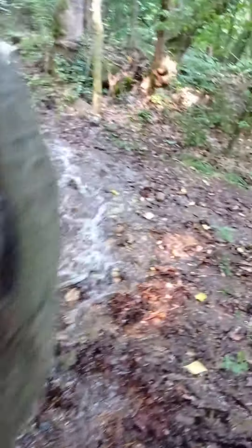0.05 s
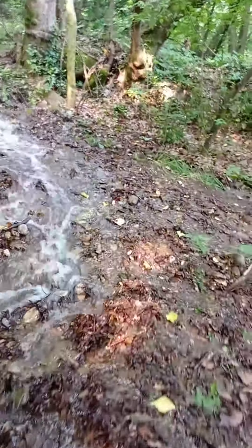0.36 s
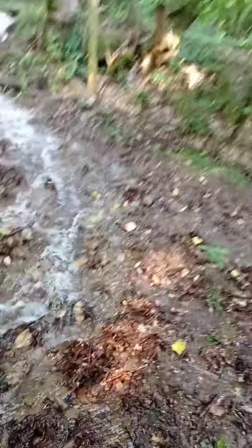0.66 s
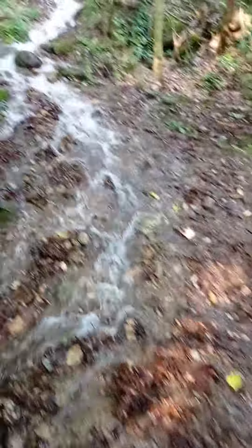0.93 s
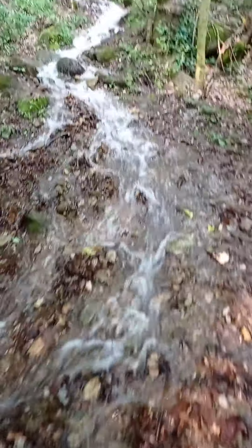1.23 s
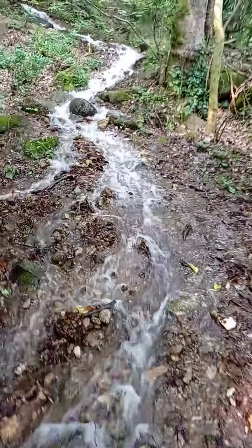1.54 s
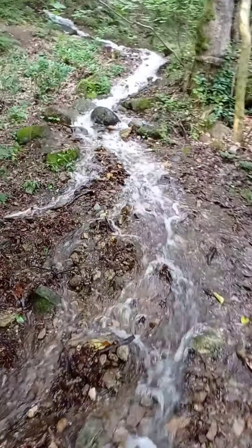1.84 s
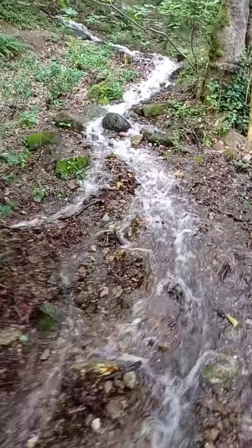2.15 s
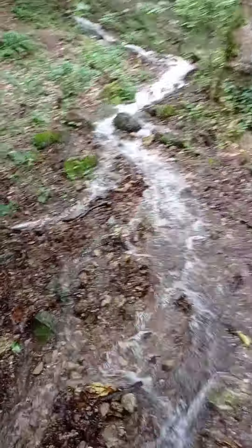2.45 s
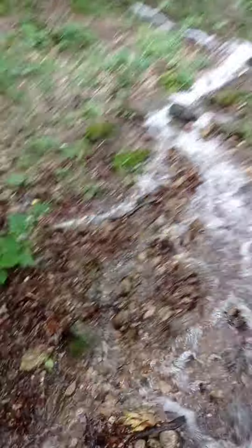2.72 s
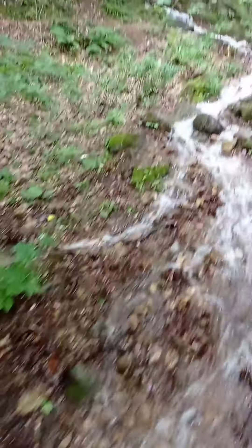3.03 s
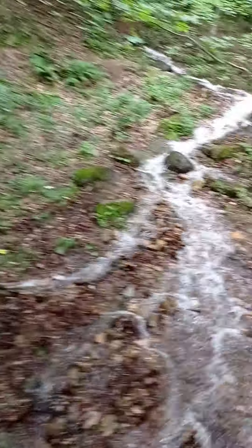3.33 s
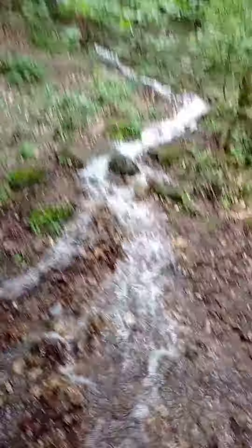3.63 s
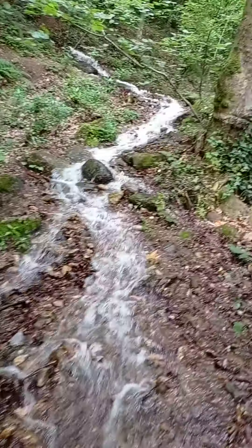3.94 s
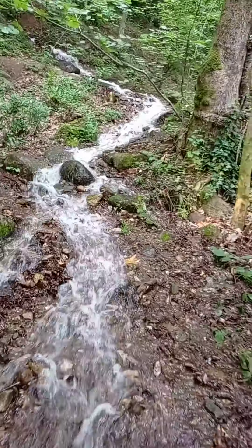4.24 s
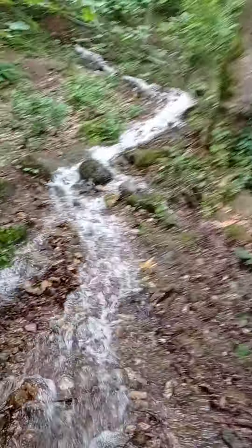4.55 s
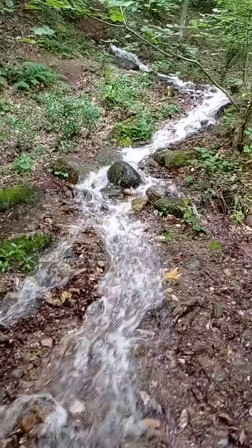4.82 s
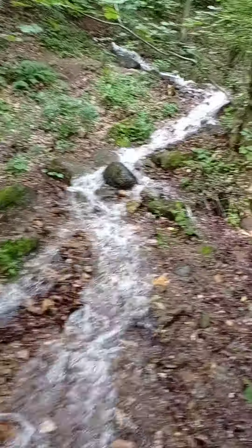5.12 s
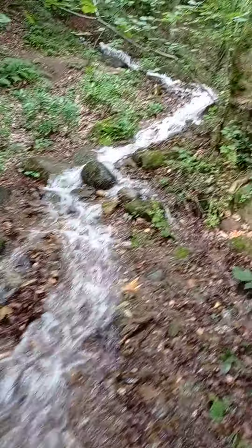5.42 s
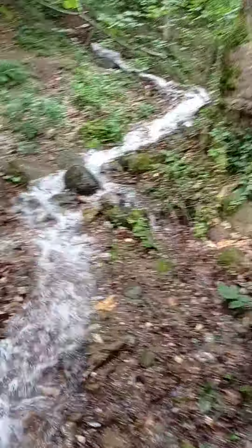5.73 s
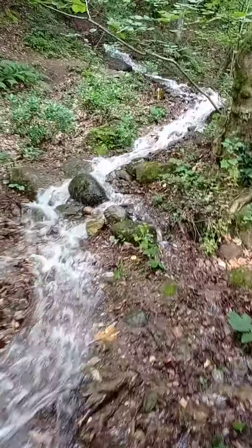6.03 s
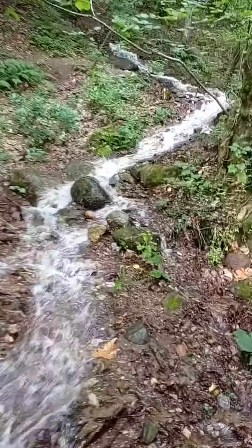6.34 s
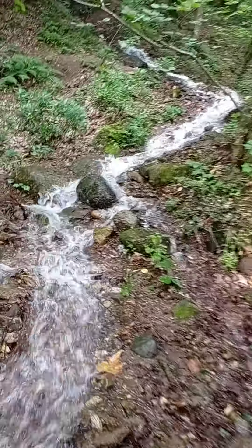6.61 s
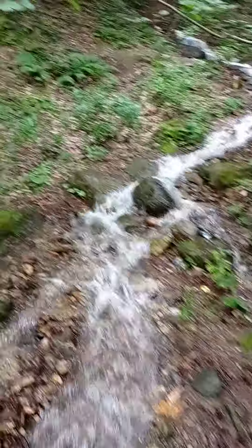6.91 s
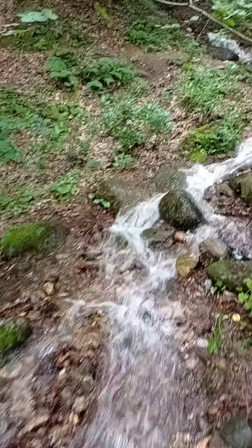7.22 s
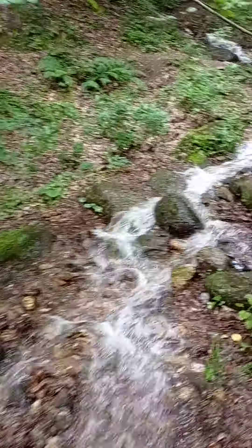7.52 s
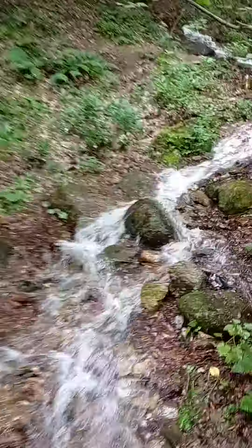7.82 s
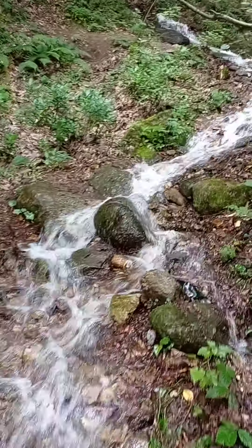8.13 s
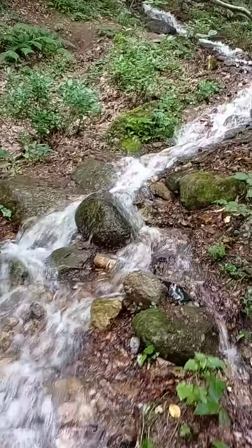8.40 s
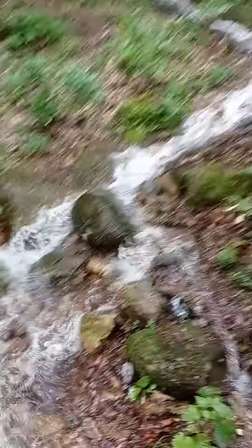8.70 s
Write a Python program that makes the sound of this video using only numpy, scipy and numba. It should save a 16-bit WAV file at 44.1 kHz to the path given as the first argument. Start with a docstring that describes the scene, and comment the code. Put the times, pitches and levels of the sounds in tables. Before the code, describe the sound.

A small stream tumbles over rocks in a forest, a steady wash of bubbling and fine spray with an occasional deeper gurgle. Throughout, a chorus of crickets blends into one shrill, shimmering trill that stands out above the water. The microphone moves slowly toward the cascade, so the splashing grows a little louder and fuller while the crickets stay level.

```python
"""A woodland stream with crickets

A small stream tumbles over rocks while one microphone is carried slowly toward the cascade.
The water is a swarm of ringing bubbles and spray over a soft wash, with now and then a deeper gurgle.
Crickets trill by scraping their wings; the forest blurs them into one shrill, shimmering band."""
import sys
import numpy as np
from scipy import signal
from scipy.fft import rfft, irfft, next_fast_len
from scipy.io import wavfile
from scipy.ndimage import uniform_filter1d
from numba import njit

SR = 44100
rng = np.random.default_rng(int(sys.argv[2]) if len(sys.argv) > 2 else 0)


def dump_mix(stems):
    """Bounce the given channels to the path in sys.argv[1] as a 16-bit WAV at rate SR."""
    frames = np.atleast_2d(stems).T  # one column per channel
    limited = np.clip(frames, -1, 1)  # hard clip at full scale
    pcm = np.round(limited * 32767).astype(np.int16)
    wavfile.write(sys.argv[1], SR, pcm)


N = 395136
TIME = np.arange(N) / SR
# where the microphone is: time_s, place (0 on the bank, 1 midway, 2 close to the rocks)
WALK = [(0, 0.16), (.6, 0.44), (1.7, 1.11), (5.5, 1.37), (7.2, 1.59), (8.9, 1.855)]


def gain_of(db):
    """Turns decibels into a number to multiply a sound by."""
    return 10 ** (np.asarray(db) / 20)


def evened(x):
    """Scales a sound to an average (rms) level of 1."""
    return x / np.sqrt(np.mean(x ** 2) + 1e-20)


def level_at(spectrum, hz):
    """Looks up the level in dB at each pitch, sliding between the rows of a table."""
    pitch_hz, level_db = np.transpose(spectrum)
    return np.interp(np.log(hz + 1), np.log(pitch_hz + 1), level_db)


def follow(rows, t=TIME):
    """Looks up a changing value at the times t."""
    return np.interp(t, *np.transpose(rows))


def add(mix, start_s, sound):
    """Mixes a sound in at its start time."""
    part = mix[max(round(start_s * SR), 0):][:len(sound)]
    part += sound[:len(part)]


def coloured(x, spectrum):
    """Gives a sound the tone colour in a table, at an average level of 1."""
    size = next_fast_len(N)
    gains = gain_of(level_at(spectrum, np.fft.rfftfreq(size, 1 / SR)))
    return evened(irfft(rfft(x, size) * gains, size)[:N])


def wander(per_s, count=2048):
    """A random curve, mostly between -1 and 1, that turns about per_s times a second."""
    return np.interp(TIME * per_s % count, np.arange(count), rng.standard_normal(count))


def ticks(per_s, spread_db, clump_db):
    """Tiny ticks at random times; clump_db makes them swell in clumps."""
    sizes = gain_of(spread_db * np.minimum(rng.exponential(1, N), 5)) * rng.choice([-1, 1], N)
    hits = rng.random(N) < per_s / SR
    return evened(sizes * hits * gain_of(clump_db * wander(45)))


def forest(x, fade_s, echo_db):
    """Trunks and leaves scatter a sound into a tail that falls 60 dB in fade_s."""
    t = np.arange(SR) / SR
    tail = rng.standard_normal(SR) * gain_of(-60 * t / fade_s)
    return x + gain_of(echo_db) * signal.oaconvolve(x, tail / np.linalg.norm(tail))[:N]


def water_gain(brook_db=-38.5, reach_m=2.115, close_m=0.99, spacing_m=2.01):
    """The brook is equally loud everywhere; the cascade adds to it, and matches it at reach_m."""
    distance_m = close_m + spacing_m * np.maximum(2 - follow(WALK), 0)
    return gain_of(brook_db) * np.hypot(1, reach_m / distance_m)


def high_hiss(relative_db=-25.8, crackle_db=-1, flicker_db=1.2):
    """A faint, thin, flickering hiss in the very highest treble."""
    # tone colour of the hiss: pitch_hz, level_db
    top_band = [(12500, -40), (13900, -17), (14350, -5), (14600, 0.5), (16000, 0), (16900, -60)]
    noise = rng.standard_normal(N)
    crackle = gain_of(crackle_db) * ticks(per_s=1600, spread_db=4.2, clump_db=2.5)
    hiss = coloured(noise + crackle, top_band)
    return hiss * water_gain() * gain_of(relative_db + flicker_db * wander(110))


def cricket(hz, trill_hz, sag, scrape):
    """Each wing stroke drags a toothed file: a short scratchy tone that sags in pitch."""
    stroke_hz = trill_hz * (1 + .04 * wander(3))
    stroke = (rng.random() + np.cumsum(stroke_hz) / SR) % 1  # runs from 0 to 1 in each stroke
    pitch_hz = hz * (1 + sag * (.5 - stroke) + scrape * wander(1800))
    closing = np.maximum(np.sin(np.pi * np.minimum(stroke / 0.65, 1)), 0)
    return closing * np.sin(2 * np.pi * np.cumsum(pitch_hz) / SR)


def crickets(group_db=-1, singers_db=-4.5, count=16, swell_db=0.37):
    """One steady singer, a group that comes and goes, and countless far ones merged into a hiss."""
    # tone colour of the chorus: pitch_hz, level_db
    song = [(4500, -34), (5100, -20), (5550, -11.5), (6000, -4.5), (6350, -1.65), (6650, -1.5),
            (6820, -4.5), (7100, -6), (7550, -10), (8000, -16), (8350, -18), (9100, -30), (10500, -46),
            (13000, -67)]
    # loudness of the chorus, before its random swells: time_s, level_db
    loudness = [(0, -27), (1.3, -26), (2.4, -26.3), (3.3, -25.7), (6.6, -26), (8.9, -26.5)]
    group = sum(cricket(hz, rng.uniform(24, 62), sag=0.0952, scrape=.06) * gain_of(wander(2.03))
                for hz in np.linspace(5500, 8100, count))
    leader = gain_of(-13.5) * evened(cricket(hz=6450, trill_hz=25.9, sag=0.082, scrape=.07))
    singers = forest(gain_of(group_db) * evened(group) + leader, fade_s=0.44, echo_db=-1)
    far = coloured(rng.standard_normal(N), song)
    chorus = far + gain_of(singers_db) * coloured(singers, song)
    return evened(chorus) * gain_of(follow(loudness) + swell_db * wander(10))


def bubble(hz, cycles, rise):
    """Trapped air rings for some cycles; its pitch climbs as it nears the surface."""
    age = np.arange(int(5 * cycles / hz * SR) + 2) / SR * hz / cycles
    swell = (1 - np.exp(-age * 10)) * np.exp(-age)
    return swell * np.sin(2 * np.pi * cycles * age * (1 + rise * age / 2))


def splashes(cycles=5.08, rise=0.043, drop_fade_s=.008, gurgle_db=2.5, drop_db=-8):
    """Single bubbles and near drops stand out of the flow and echo among the trees."""
    # the loudest bubbles: time_s, pitch_hz, level_db (gurgle_db is added)
    gurgles = [(.552, 516, -35), (1.159, 990, -33), (1.446, 2400, -30), (2.248, 320, -34),
               (2.593, 4795, -28), (3.603, 299, -37), (3.636, 412, -31.5), (3.798, 771, -30.5),
               (4.226, 880, -32.5), (4.437, 335, -34), (5.212, 266, -36), (5.886, 206, -35),
               (6.772, 890, -27), (6.915, 380, -31.5), (7.19, 630, -31), (7.522, 262, -34),
               (8.119, 280, -35), (8.596, 824, -26.5)]
    # drops that land on stone nearby: start_s, level_db (drop_db is added)
    drops = [(.97, -32), (1.446, -36), (3.459, -35), (7.711, -36), (8.049, -35), (8.419, -36)]
    glugs_per_s, low_hz, high_hz, glug_db = 2.2, 282, 3300, -38  # softer bubbles that come by chance
    when, pitch = rng.random((round(glugs_per_s * N / SR), 2)).T
    glug_hz = low_hz * (high_hz / low_hz) ** pitch
    glugs = [(time_s, hz, glug_db) for time_s, hz in zip(when * N / SR, glug_hz)]
    mix, t = np.zeros(N), np.arange(1024) / SR
    for time_s, hz, level_db in gurgles + glugs:
        rings = cycles * (hz / 1000) ** .2
        start_s = time_s - 0.589 * rings / hz  # early, so the ring is centred near time_s
        add(mix, start_s, gain_of(level_db + gurgle_db) * bubble(hz * (1 - rise), rings, rise))
    for start_s, level_db in drops:
        fade = gain_of(level_db + drop_db - 60 * t / drop_fade_s)
        add(mix, start_s, fade * rng.standard_normal(len(t)))
    return forest(mix, fade_s=0.19, echo_db=-15)


@njit
def ring_bubbles(rows, length):
    """Adds up many bubbles, each a fading tone that rises in pitch."""
    mix = np.zeros(length)
    for start, cycles_per_sample, cycles, rise, size in rows:
        for i in range(min(int(4 * cycles / cycles_per_sample), length - int(start))):
            age = i * cycles_per_sample / cycles
            swell = (1 - np.exp(-age * 10)) * np.exp(-age)
            tone = np.sin(2 * np.pi * cycles * age * (1 + rise * age / 2))
            mix[int(start) + i] += size * swell * tone
    return mix


def bubbles(spread_db, cycles, rise, count=70000):
    """A swarm of bubbles: small ones ring high and are alike, large ones ring low and are uneven."""
    when, smallness, strength, sustain, climb = rng.random((count, 5)).T
    hz = 150 + 15000 * smallness ** 1.7
    rings = cycles * (hz / 1000) ** 0.38 * (.5 + sustain)
    crowding = smallness ** -.7  # how tightly the bubbles are packed around this pitch
    uneven_db = spread_db * (.7 + .5 / (1 + hz / 600))
    level_db = uneven_db * (np.minimum(-np.log(1 - strength), 4) - 2)
    size = gain_of(level_db) * np.sqrt(hz / rings / crowding)  # spreads the power evenly over pitch
    rows = np.column_stack([when * N, hz / SR, rings, 2 * rise * climb, size])
    return evened(ring_bubbles(rows, N))


def stream(bubbles_db=-1, spray_db=-9, patchy_db=0.47, churn_db=4.5, churn_hz=115):
    """Wash, bubbles and spray surge in patches; the tone colour changes on the way to the rocks."""
    # tone colour of the water from the bank, midway and close to the rocks: pitch_hz, level_db
    bank = [(50, -10), (100, -3.5), (160, -4), (205, 0), (390, 2.5), (670, -4), (900, 1), (1480, -5),
            (2200, -6.5), (3400, -7.5), (5000, -7.5), (9500, -21), (13500, -33)]
    midway = [(50, -9.5), (150, -5.5), (205, -2.5), (340, 0.5), (520, -4), (660, -1.5), (840, 0.5),
              (1100, -4.5), (2300, -3.5), (3400, -7.5), (5000, -6.5), (9500, -21.5), (13500, -33)]
    close = [(50, -11), (130, -6), (210, 4.5), (420, -2), (650, 2.5), (890, 4.5), (1100, -1.5),
             (2200, -2.5), (3400, -5.5), (5000, -4.5), (9500, -19.5), (13500, -33)]
    water = rng.standard_normal(N)  # the soft wash
    water += gain_of(bubbles_db) * bubbles(spread_db=2.7, cycles=3.2, rise=.07)
    water += gain_of(spray_db) * ticks(per_s=1500, spread_db=0.5, clump_db=0)  # tiny drops of spray
    # split the sound into a grid of pitch and time
    hz, t, grid = signal.stft(water, SR, nperseg=2048, noverlap=1536)
    place = follow(WALK, t)
    shares = [np.maximum(1 - abs(place - k), 0) for k in range(3)]
    colour_db = sum(level_at(spectrum, hz)[:, None] * share
                    for spectrum, share in zip((bank, midway, close), shares)) / sum(shares)
    patches = uniform_filter1d(rng.standard_normal(grid.shape), size=14, axis=0)
    patches = evened(uniform_filter1d(patches, size=6, axis=1))
    # the plunging water churns unevenly, so the bass swells and ebbs as one
    churn = np.interp(t, TIME, wander(14)) / (1 + (hz[:, None] / churn_hz) ** 2)
    power = np.mean(gain_of(colour_db) ** 2, axis=0)
    grid = grid * gain_of(colour_db + patchy_db * patches + churn_db * churn) / np.sqrt(power)
    water = signal.istft(grid, SR, nperseg=2048, noverlap=1536)[1][:N]
    return evened(water) * water_gain()


def scene(dip_at_s=7.98, dip_width_s=.17, dip_db=-1.2):
    """Water, crickets and hiss sound the same in both ears; the level dips briefly near the end."""
    mono = stream() + crickets() + high_hiss() + splashes()
    mono *= gain_of(dip_db * np.exp(-((TIME - dip_at_s) / dip_width_s) ** 2))
    return np.array([mono, mono])


def record(dry, low_cut_hz=75, high_cut_hz=15720):
    """The small microphone loses the deep bass; the very highest treble is cut off too."""
    bass_cut = signal.butter(N=3, Wn=low_cut_hz, btype="high", fs=SR, output="sos")
    treble_cut = signal.firwin(2047, high_cut_hz, window=("kaiser", 9), fs=SR)
    return signal.oaconvolve(signal.sosfilt(bass_cut, dry), treble_cut[None], "same")


dry = scene()
out = record(dry)
dump_mix(out)
```